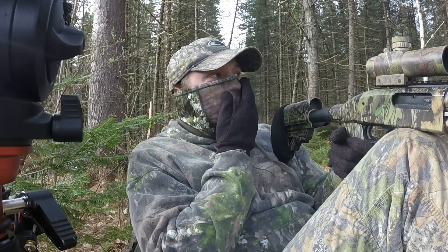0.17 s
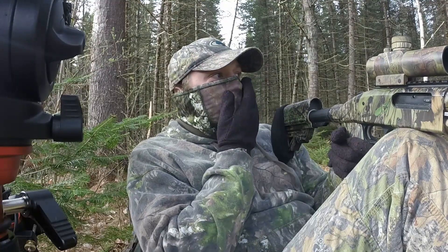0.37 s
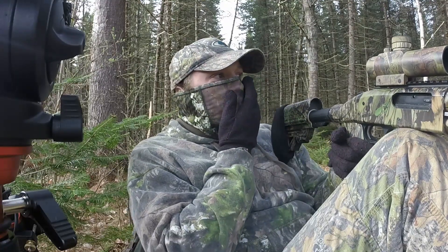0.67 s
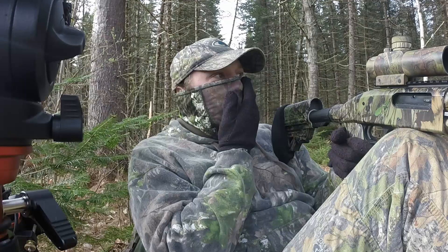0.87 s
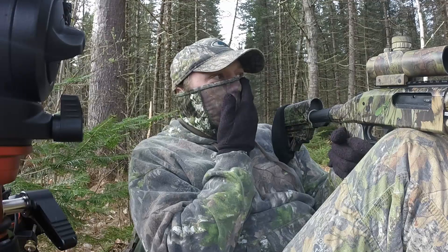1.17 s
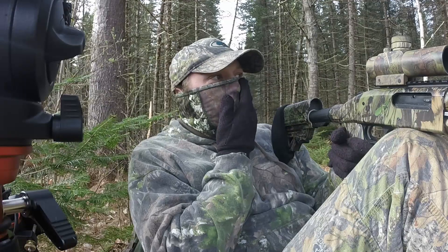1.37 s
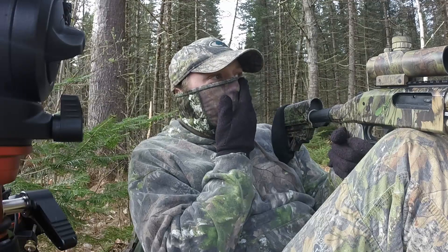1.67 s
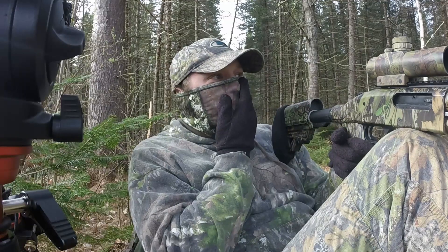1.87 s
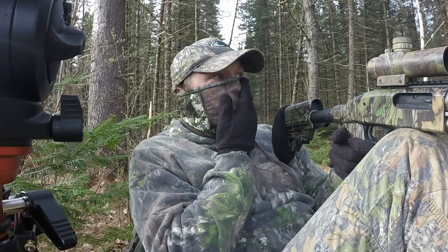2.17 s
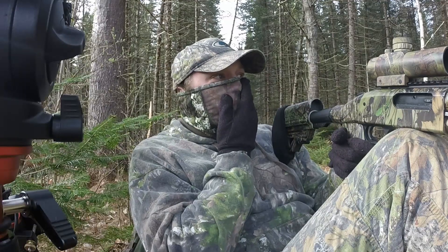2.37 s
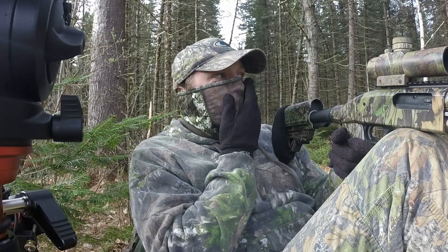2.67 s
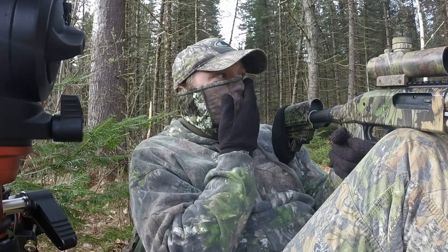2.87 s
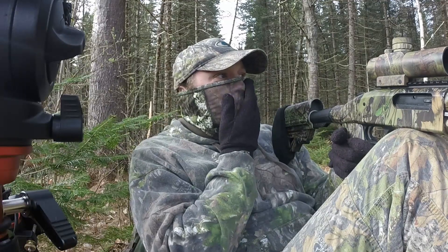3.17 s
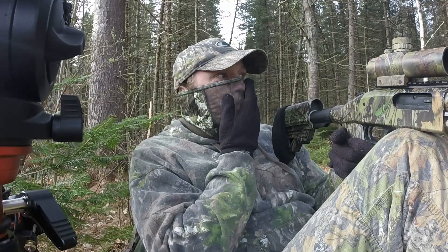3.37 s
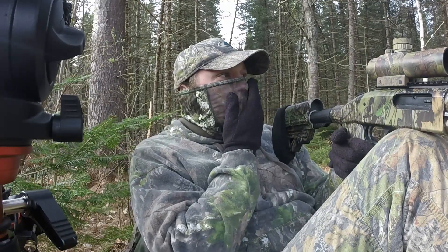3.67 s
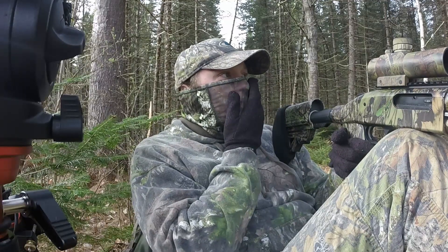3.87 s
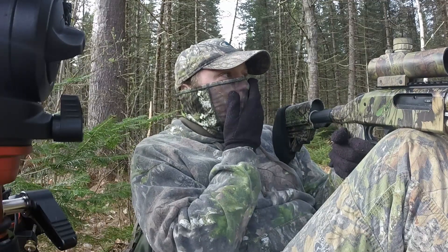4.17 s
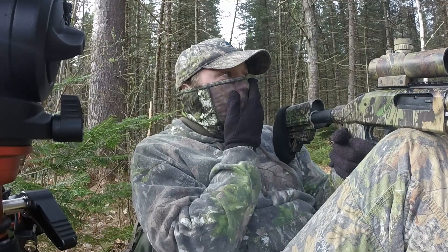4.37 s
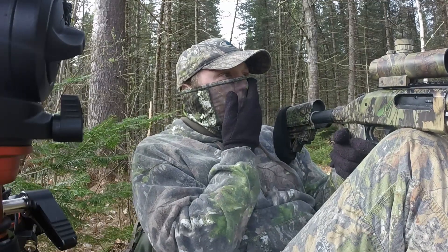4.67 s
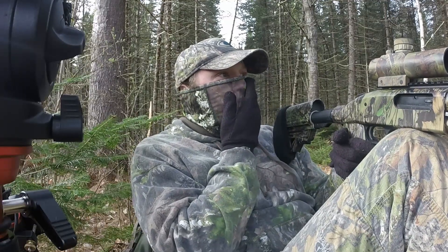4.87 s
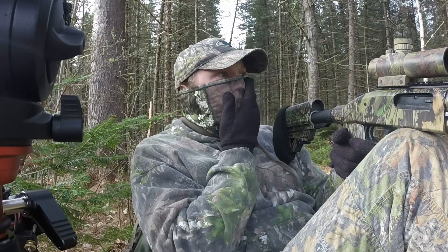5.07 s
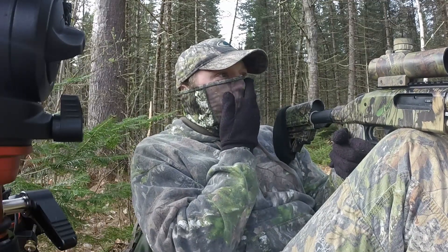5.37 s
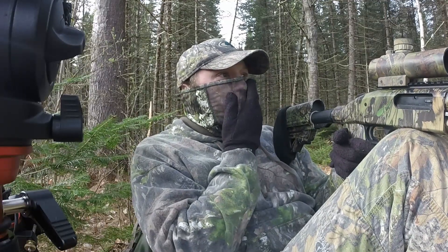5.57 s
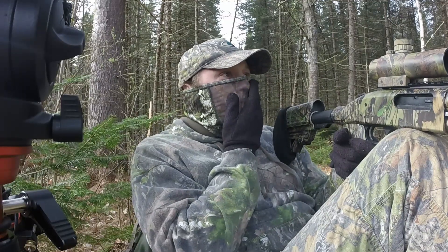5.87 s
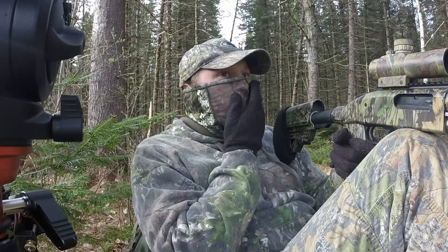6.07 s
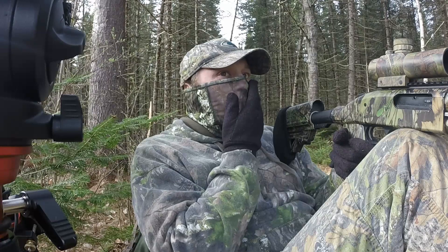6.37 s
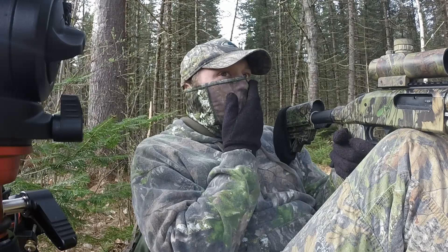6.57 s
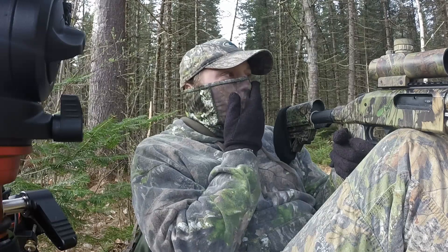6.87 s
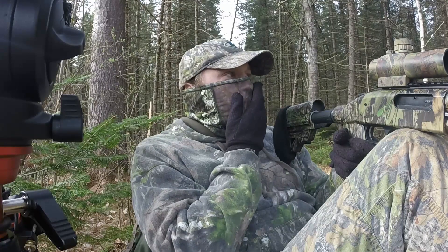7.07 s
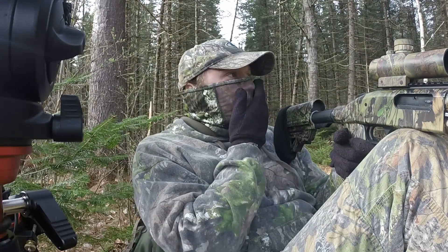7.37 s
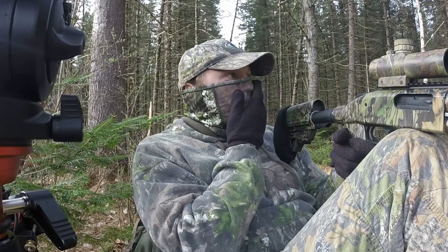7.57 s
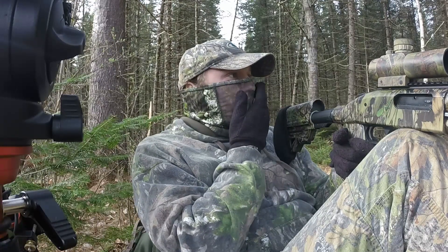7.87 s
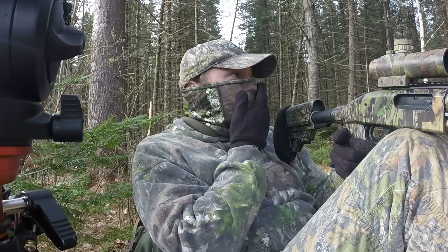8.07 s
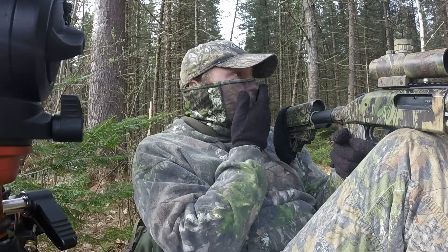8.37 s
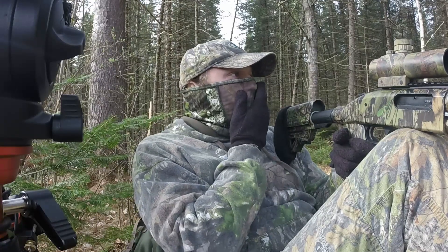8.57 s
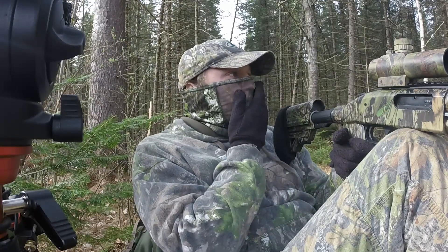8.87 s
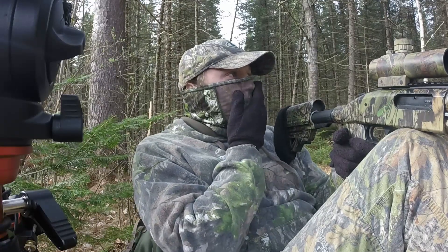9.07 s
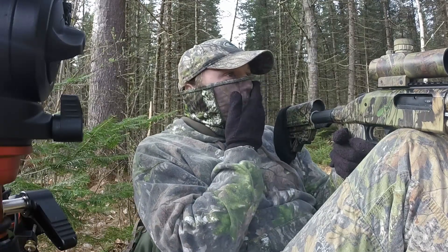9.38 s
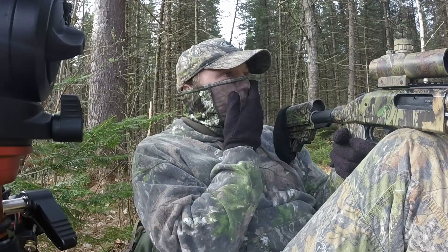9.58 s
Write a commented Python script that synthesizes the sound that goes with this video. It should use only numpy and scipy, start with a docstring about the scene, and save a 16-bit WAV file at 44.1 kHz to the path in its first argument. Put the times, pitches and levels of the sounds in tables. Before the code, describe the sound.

A hunter close by works a turkey mouth call in raspy yelps and sharp cutts while a distant tom gobbles back in a quiet conifer forest.

```python
"""A quiet conifer forest: a hunter works a turkey mouth call close by, with whines and yelps, then sharp
cutts, and at the end one more whine and yelp. Its reed is a harmonic oscillator that slides down clear, breaks
into a beating, noisy rasp, and darkens as the jaw drops and the octave fades; loud peaks saturate the recorder.
A distant tom answers twice with frequency-modulated gobbles. Far clucks and small songbirds are gliding
sines, scattered by the trees as decaying noise echoes, over filtered noise for the forest air."""
import sys
import numpy as np
from scipy import signal
from scipy.fft import rfft, irfft, next_fast_len
from scipy.io import wavfile

SR = 44100
rng = np.random.default_rng(int(sys.argv[2]) if len(sys.argv) > 2 else 0)


def unload_audio(sound):
    """Save the sound as a 16-bit wav file, at the path given as the first command line argument."""
    columns = np.transpose(np.atleast_2d(sound))
    # keep every value between -1 and 1, then stretch to whole-number steps
    steps = np.round(np.clip(columns, -1, 1) * 32767)
    wavfile.write(sys.argv[1], SR, steps.astype(np.int16))


N = 428652
TIME = np.arange(N) / SR  # s


def undb(db):
    """Level to amplitude: 20 dB is a factor of ten."""
    return 10 ** (np.asarray(db) / 20)


def unit(x):
    """Normalization: scale to an rms amplitude of 1."""
    return x / np.sqrt(np.mean(np.abs(x) ** 2))


def at_hz(hz, points):
    """Logarithmic frequency scale: interpolate (f/Hz, value) points along it."""
    f, value = np.transpose(points)
    return np.interp(np.log(hz + 1e-6), np.log(f), value)


def colour(x, points):
    """Linear filtering: weight the spectrum by (f/Hz, gain/dB) points."""
    n = x.shape[-1]
    gain = undb(at_hz(np.fft.rfftfreq(n, 1 / SR), points))
    return irfft(rfft(x) * gain, n)


def noise(size, width_hz, centre_hz=0):
    """Narrow-band noise under a Gaussian spectrum; centred on zero it is a random wobble."""
    n = next_fast_len(size + 8192)
    bell = np.exp(-.5 * ((np.fft.rfftfreq(n, 1 / SR) - centre_hz) / width_hz) ** 2)
    return unit(irfft(rfft(rng.standard_normal(n)) * bell, n))[:size]


def turn(hz):
    """Frequency modulation: phase is the running integral of frequency."""
    return 2 * np.pi * np.cumsum(hz) / SR


def swell(x):
    """Raised-cosine envelope: a smooth rise from 0 to 1 as x goes from 0 to 1."""
    return np.sin(np.pi / 2 * np.clip(x, 0, 1)) ** 2


def switch(t, at_s, width_s):
    """Sigmoid transition: a soft step from 0 to 1 around a moment."""
    return .5 + .5 * np.tanh((t - at_s) / width_s)


def add(track, s, sound):
    """Superposition: mix a sound into a track from a given time."""
    start = max(int(s * SR), 0)
    part = sound[:max(N - start, 0)]
    track[start:start + len(part)] += part


def trees(x, early_t60, late_t60, late_db, dull_hz):
    """Reverberation by scattering: near trunks decay fast, deep forest slowly; needles absorb treble."""
    t = TIME[:int(1.5 * SR)]
    decay = undb(-60 * t / early_t60) + undb(late_db - 60 * t / late_t60)
    fade = decay * np.clip((t - .006) / 0.0082, 0, 1)
    lowpass = signal.butter(2, min(dull_hz, .4 * SR), fs=SR, output="sos")
    echoes = signal.sosfilt(lowpass, rng.standard_normal((2, len(t))), axis=1)
    response = echoes * fade / np.sqrt(np.sum(fade ** 2))
    return signal.fftconvolve(x[None], response, axes=1)[:, :N]


def forest_air(level_db=-48, left_db=1.18, right_db=.5):
    """Partly coherent noise: low rumble shared by both sides, under a soft wide hiss."""
    # spectrum of the air: f/Hz, relative spectral level/dB
    air = [(20, -12), (62, 0.08), (95, -2), (160, -1), (280, -10), (450, -14), (900, -14.5), (1600, -21.5),
           (2400, -24.5), (4000, -27), (6500, -29), (8000, -31.5), (10000, -32), (15500, -43)]
    # coherence of left and right: f/Hz, likeness [0-1]
    likeness_points = [(30, .75), (80, 1), (170, .45), (350, 0.1004), (1000, .1), (8000, .03)]
    likeness = np.clip(at_hz(np.fft.rfftfreq(N, 1 / SR), likeness_points), 0, 1)
    mid, side = (unit(colour(rng.standard_normal(N), air)) for _ in range(2))
    side = irfft(rfft(side) * np.sqrt((1 - likeness) / (1 + likeness)), N)
    return np.array([mid + side, mid - side]) * undb([[left_db], [right_db]]) * undb(level_db)


def chirp(length, start_hz, end_hz, db, hoarse, hoarse_hz):
    """Gliding sine under a tapered envelope; random frequency modulation makes it hoarse."""
    n = max(int(length * SR), 64)
    hz = np.linspace(start_hz, end_hz, n) * (1 + hoarse * noise(n, hoarse_hz))
    return undb(db) * np.sqrt(2) * np.sin(turn(hz)) * signal.windows.tukey(n, .6)


def songbirds(song_direct_db=-9, song_forest_db=-1, chip_lead=0.021, chip_scatter_db=1.2,
              chip_direct_db=-1.5, chip_forest_db=-2, whistle_direct_db=-5, whistle_forest_db=-8):
    """Gliding tones, direct and scattered: a growing see-saw song, scratchy chips and pure whistles."""
    # one phrase of the song: offset t/s, length/s, start f/Hz, end f/Hz, level relative to the phrase/dB
    phrase = [(-.058, .04, 6900, 5300, -7), (-.012, .03, 6500, 5200, -4), (0, .04, 5600, 3950, -1),
              (.115, .06, 3050, 4700, -3), (.155, .03, 4600, 4450, -2), (.198, .045, 4150, 3200, -2)]
    # runs of thin chips from a second bird: t/s (chips lead it), number of chips, gap/s,
    # mean level before the path gains/dB
    chip_runs = [(.139, 2, .17, -60), (.562, 6, .099, -55.5), (1.378, 4, .095, -53.5), (1.93, 1, .1, -53),
                 (2.41, 4, 0.091, -54.5), (2.859, 4, .098, -53), (3.5, 3, 0.093, -53),
                 (4.699, 2, .111, -53.5), (5.681, 2, .101, -53), (6.34, 1, .1, -49.5),
                 (6.636, 3, 0.087, -51), (7.71, 2, .371, -48), (8.455, 5, 0.14, -50.5)]
    # whistles of other birds: t/s, length/s, start f/Hz, end f/Hz, level before the path gains/dB
    whistle_notes = [(3.438, 0.064, 6820, 7500, -55), (4.196, 0.1, 7250, 6800, -64),
                     (4.4, 0.15, 2800, 2830, -48.5), (4.598, 0.057, 5360, 5406, -56),
                     (4.64, 0.032, 4400, 3585, -47.5), (4.655, 0.033, 4300, 3490, -53.5),
                     (4.893, 0.087, 2754, 2770, -47), (5.056, 0.1, 5200, 5190, -54),
                     (8.249, 0.15, 7180, 7350, -58), (8.809, 0.13, 7400, 8080, -62)]
    song_s, first_gap_s, gap_growth_s = 5.843, .343, .0045
    full_db, soft_db, swell_s = -37, -17.5, 0.71  # full level, start relative to it, time constant of the swell

    song, chips, whistles = np.zeros((3, N))
    for k in range(8):
        s = song_s + k * first_gap_s + gap_growth_s * k * (k - 1) / 2
        db = full_db + soft_db * np.exp((song_s - s) / swell_s)
        for offset, length, start_hz, end_hz, part_db in phrase:
            add(song, s + offset, chirp(length, start_hz, end_hz, db + part_db, hoarse=.03, hoarse_hz=300))
    for s, count, gap, db in chip_runs:
        for k in range(int(round(count))):
            chip_db = db + chip_scatter_db * rng.standard_normal()
            add(chips, s - chip_lead + k * gap, chirp(.032, 6500, 5000, chip_db, hoarse=.15, hoarse_hz=500))
    for s, length, start_hz, end_hz, db in whistle_notes:
        add(whistles, s, chirp(length, start_hz, end_hz, db, hoarse=0.00404, hoarse_hz=80))

    far = undb(song_forest_db) * song + undb(whistle_forest_db) * whistles
    out = undb(song_direct_db) * song + undb(whistle_direct_db) * whistles + undb(chip_direct_db) * chips
    out = out + trees(far, early_t60=0.33, late_t60=1.0, late_db=-7, dull_hz=12000)
    chip_echo = trees(chips, early_t60=.16, late_t60=.6, late_db=-21.5, dull_hz=12000)
    return out + undb(chip_forest_db) * chip_echo


def clucks(forest_db=-7, direct_db=-1):
    """Falling, randomly frequency-modulated tones, with direct sound and scatter."""
    # far clucks: t/s, length/s, middle f/Hz, level before the path gains/dB
    cluck_notes = [(0.424, 0.04, 1133, -52), (2.828, 0.11, 1261, -50), (4.127, 0.058, 1276, -48),
                   (7.857, 0.014, 1600, -39.5), (7.876, 0.013, 1360, -39.5), (8.745, 0.032, 1195, -50.5)]
    dry = np.zeros(N)
    for s, length, hz, db in cluck_notes:
        add(dry, s, chirp(length, 1.06 * hz, hz / 1.06, db, hoarse=.13, hoarse_hz=350))
    echo = trees(dry, early_t60=0.24, late_t60=.8, late_db=-18.5, dull_hz=6150)
    return undb(direct_db) * dry + undb(forest_db) * echo


def whine(length, start_hz, low_hz, slide_s, db, steepness, octave_db, crack_s, depth):
    """Exponential glide, then register crack: pitch, loudness, octave and rasp of a clear note."""
    turn_at, rise, curve = .45, .38, 1.7  # share of the note where pitch turns, share it climbs, power of the climb
    clear_rasp, opens_at, end_octave_db = .05, .63, -12.5  # from opens_at on, the octave sinks to the end level
    flutter_depth, flutter_hz = .12, 94.96
    # crack: Gaussian width, added rasp, dip of the octave, loss after it, upward pitch share, rasp left behind
    width_s, crack_rasp, crack_octave_db, loss_db, jump, frayed_rasp = 0.0039, 0.79, -19.5, -9.5, .3, 0.075

    t = TIME[:int(length * SR)]
    along = t / length
    crack = depth * np.exp(-((t - crack_s) / width_s) ** 2)
    after = switch(t, crack_s, 2 * width_s)
    climb = np.clip((along - turn_at) / (1 - turn_at), 0, 1) ** curve
    hz = low_hz * (1 + rise * climb + jump * crack) + (start_hz - low_hz) * np.exp(-t / slide_s)
    loud = (1 - np.abs(2 * along - 1)) ** steepness * undb(db + depth * loss_db * after)
    loud = loud * np.exp(flutter_depth * noise(len(t), flutter_hz / 3, flutter_hz))
    octave = np.interp(along, [opens_at, 1], [octave_db, end_octave_db]) + crack_octave_db * crack
    return hz, loud, octave, clear_rasp + crack_rasp * crack + frayed_rasp * after


def yelp(length, attack, release, break_s, jaw_s, octave_db, fall_db_per_s, db, open_db,
         pitch_hz, open_hz, rasp, open_rasp):
    """Resonator retuning: the reed scoops down and breaks, then the jaw drops and the octave fades."""
    scoop_hz, scoop_share = 1418, .24  # starting pitch; time constant of the scoop as a share of the attack
    jaw_width_s, pitch_lag_s = .005, .008  # softness of the jaw drop; the reed's pitch follows this much later
    octave_floor_db = -26.5
    break_width_s, clear_rasp, rasp_ease = .003, .11, 0.21  # rasp before the break; share of the excess gone by the end

    t = TIME[:int(length * SR)]

    def with_jaw(before, after, lag=0):
        """Smooth transition between closed and open jaw."""
        return before + (after - before) * switch(t, jaw_s + lag, jaw_width_s)

    scoop = (scoop_hz - pitch_hz) * np.exp(-t / (scoop_share * attack))
    hz = with_jaw(pitch_hz, open_hz, pitch_lag_s) + scoop
    loud = swell(t / attack) * swell((length - t) / release) * undb(with_jaw(db, open_db))
    octave = np.clip(fall_db_per_s * (jaw_s - t), octave_floor_db, octave_db)
    broken = switch(t, break_s, break_width_s) * (1 - rasp_ease * swell(2 * t / length - 1))
    return hz, loud, octave, clear_rasp + (with_jaw(rasp, open_rasp) - clear_rasp) * broken


def reed_note(s, hz, loud, octave_db, rasp, patchy_db=2.8, stagger=.045, bloom=.1, flutter_hz=262,
              flutter=0.25, jitter=0.39, shake=0.08, throb=.38, tear=1.0, spray_db=-11,
              clean_spray_db=-42, low_share=0.097, sideband_share=0.12, quiver=0.12, lower_share=0.12):
    """Coupled oscillation: a latex reed sings, and with rasp a second, lower reed beats against it."""
    # overtones above the octave: f/Hz, level relative to the octave/dB
    overtones = [(2200, -22), (2600, -25.5), (3150, -21.5), (3450, -22.5), (3700, -41), (4200, -30.5),
                 (5200, -46), (6100, -39), (7500, -58), (12000, -66)]
    # spray of the rasping reed: f/Hz, relative spectral level/dB
    spray_points = [(100, -34.5), (420, -35), (700, -18), (1200, -11.5), (1900, 1), (2900, -7.5),
                    (4000, -12.5), (5200, -31), (6500, -24), (8500, -26.5), (10200, -31), (15500, -48.5)]
    # resonances of the mouth cavity: f/Hz, width/Hz, relative level/dB
    cavity = [(2600, 130, 8), (3850, 300, 1), (6700, 450, 2)]
    # set of the mouth: t/s, ring of the cavity/dB, lift of the highest overtones/dB
    mouth_set = [(1.2, -41, -4), (1.5, -37.5, -1), (2.4, -37, 2.5), (4.9, -20, -1.5), (5.25, -22, 1),
                 (5.4, -21.5, -0.5), (9.2, -31, 5.5)]

    rasp, n = np.clip(rasp, 0, 1), len(hz)
    t = s + TIME[:n]
    # as the jaw drops, the mouth passes the power from the octave to the fundamental
    low = loud / np.sqrt(1 + undb(octave_db) ** 2)
    high = low * undb(octave_db)
    # uneven swings smear each overtone more than the one below it
    beat = turn(flutter_hz * (1 + .2 * noise(n, 76.8)))
    # a rasping reed cannot hold its pitch and staggers around it
    unsteady_hz = hz * (1 + .003 * noise(n, 80) + stagger * rasp * noise(n, 40))
    phase = turn(unsteady_hz) + rasp * (flutter * np.sin(beat) + jitter * noise(n, 240))
    # the lower reed's octave and the sum tone of both reeds fill the gap under the first octave
    lower = phase - beat
    torn = np.clip(tear * rasp ** 1.9, 0, 1)
    octave = np.sqrt(1 - torn) * np.sin(2 * phase)
    octave = octave + np.sqrt(torn / 2) * (np.sin(2 * lower) + np.sin(phase + lower))
    # the lower reed sounds under the fundamental, and their beat throws a sideband above it
    sideband = rasp * loud * (lower_share * np.sin(lower) + sideband_share * np.sin(phase + beat))
    fundamental = low * np.sin(phase) * (1 + throb * np.sqrt(rasp) * noise(n, 42, 110))
    tone = fundamental + high * octave * (1 + quiver * noise(n, 30, 110)) + sideband

    edge = high + low_share * rasp * low  # strength that feeds the overtones and the spray
    mouth_s, *mouth = np.transpose(mouth_set)
    ring_db, lift_db = (np.interp(t, mouth_s, column) for column in mouth)
    # the upper overtones grow slightly faster than the note's loudness, the highest most
    push = loud / loud.max()
    for k in range(3, 13):
        lift = lift_db * at_hz(k * hz, [(3600, 0), (4200, 0.99)])
        overtone_db = at_hz(k * hz, overtones) + lift + patchy_db * noise(n, 45)
        tone += edge * push ** (bloom * (k - 2)) * undb(overtone_db) * np.sin(k * phase)
    tone *= np.sqrt(2) * (1 + shake * rasp * (np.cos(beat) + noise(n, 230)))

    # air escapes in uneven spits, chopped once a cycle
    spray = unit(colour(rng.standard_normal(n), spray_points))
    spray = spray * (undb(clean_spray_db) + undb(spray_db) * rasp ** 2.3)
    ring = rasp * sum(undb(db) * noise(n, width, f) for f, width, db in cavity) * undb(ring_db)
    spits = unit(np.exp(.42 * noise(n, 130)) * (1 + .5 * np.sin(phase)))
    return tone + edge * (spray + ring) * spits


def mouth_call(forest_db=-22.0):
    """Direct sound, early reflections and scatter: the call's notes, a little stronger on the left."""
    # clear whines: t/s, length/s, starting f/Hz, lowest f of the glide/Hz, slide time constant/s,
    # level before the crack/dB, steepness of the swell [power], octave over fundamental/dB,
    # crack after/s, depth of the crack [0-1]
    whine_notes = [(1.130, .152, 1100, 742.5, .020, -19.7, 1.0, 11.5, 0.054, 0.19),
                   (1.441, .133, 1059, 733.5, .011, -3.5, 0.7, 20.5, .083, 1),
                   (9.223, 0.18, 930, 715, .026, -16, 1.3, 5.5, .114, .2)]
    # rasping yelps and, with a quick attack, cutts: t/s, length/s, attack/s, release/s, reed breaks after/s,
    # jaw drops after/s, highest octave over fundamental/dB, its fall/(dB/s), then each before and after
    # the jaw drops: level/dB, level/dB, f/Hz, f/Hz, rasp [0-1], rasp [0-1]
    yelp_notes = [(1.721, 0.12, .034, .028, .036, .052, 7, 329.5, -8.5, -5.5, 986, 1057, 0.5, .75),
                  (1.994, .124, .030, .022, .033, .069, 4.5, 900, -9.5, -7, 1014, 1060, .92, .72),
                  (2.288, .105, .044, 0.022, .032, .044, 6, 600, -9.5, -7, 990, 1090, .9, .75),
                  (4.969, .085, .008, .012, .001, .033, 7, 450.5, -10, -7.5, 895, 1002, 0.73, .95),
                  (5.127, 0.11, 0.0094, 0.04, .003, 0.042, 0.5, 151, -10, -7.5, 1041, 1090, 0.96, 1),
                  (5.322, .097, .008, .015, 0.0068, .049, 9.5, 341.5, -9.5, -8.5, 1038, 1095, 0.91, 1),
                  (9.502, 0.15, .062, 0.034, .054, .069, 8.5, 800, -10, -7, 777, 1103, .55, .88)]
    # lead of the left microphone port over the right, for the caller: f/Hz, phase/rad
    port_lead = [(200, -0.29), (520, -0.82), (800, -0.47), (1290, -0.87), (1720, -0.31), (2200, -0.55),
                 (4000, 0.74), (8000, 0.97)]
    # reflections from the gun, the knee and the ground: delay/s, left level/dB, right level/dB
    nearby = [(.0052, -19.5, -18.5), (.0074, -19, -15), (0.0158, -20, -16.5)]

    dry = np.zeros(N)
    for gesture, notes in (whine, whine_notes), (yelp, yelp_notes):
        for s, *shape in notes:
            add(dry, s, reed_note(s, *gesture(*shape)))
    lead = at_hz(np.fft.rfftfreq(N, 1 / SR), port_lead)
    left = irfft(rfft(dry) * np.exp(1j * lead), N)
    out = np.array([undb(1.1) * left, undb(-.5) * dry])
    for delay, *sides_db in nearby:
        for ear, db in zip(out, sides_db):
            add(ear, delay, undb(db) * dry)
    # the bright part of the call carries furthest among the trunks
    outward = colour(dry, [(700, -0.5), (1050, -2.0), (1300, 4.0), (1550, -2),
                           (2100, -0.5), (3500, 5.5), (7000, 4.0)])
    echo = trees(outward, early_t60=.4, late_t60=1.25, late_db=-19, dull_hz=8000)
    return out + undb(forest_db) * echo


def gobbles(start_hz=665, end_hz=570, rattle_hz=19, fall_db=-12, rattle_db=-6, yelp_db=1.5, direct_db=-3):
    """Amplitude and frequency modulation: a first yelp over a fading, hoarse rattle, blurred by scatter."""
    # the tom's gobbles: t/s, length/s, attack of the yelp/s, level before the part and path gains/dB
    gobble_calls = [(3.166, 1.3, 0.041, -38.5), (6.613, .85, 0.006, -39.5)]
    # his voice after its way through the trees: f/Hz, gain/dB
    tom = [(450, -28), (670, -11), (780, -18.5), (1050, -6), (1320, -8.5), (1550, -11.5), (1800, -15.5),
           (2150, -20), (2650, -22), (3200, -19.5), (5000, -35), (8000, -39)]
    dry = np.zeros(N)
    for s, length, attack, db in gobble_calls:
        t = TIME[:int(length * SR)]
        n = len(t)
        syllable = turn(rattle_hz * (1 + 0.32 * noise(n, 8)))
        glide_hz = np.interp(t, [0, length], [start_hz, end_hz])
        hz = glide_hz * (1 + 0.0986 * np.sin(syllable) + 0.27 * noise(n, 249.4))
        voice = unit(colour(sum(np.sin(k * turn(hz)) for k in range(1, 10)), tom))
        ramps = np.clip(np.minimum(t / 0.046, (length - t) / 0.092), 0, 1)
        rattle = voice * undb(rattle_db + fall_db * t / length) * ramps * (1 + .5 * np.sin(syllable))
        # the first yelp lies an octave above the rattle's starting pitch
        first_yelp = np.sqrt(2) * np.sin(turn(2 * start_hz * (1 + 0.08 * noise(n, 202))))
        first_yelp = first_yelp * np.minimum(t / attack, 1) * np.exp(-(t / 0.087) ** 2)
        add(dry, s, undb(db) * (undb(yelp_db) * first_yelp + rattle))
    return undb(direct_db) * dry + trees(dry, early_t60=0.35, late_t60=1.2, late_db=-12.5, dull_hz=9000)


def scene():
    """Superposition: the caller close by, the birds far off, and the air around them."""
    return mouth_call() + gobbles() + clucks() + songbirds() + forest_air()


def record(dry, drive_db=-0.16, duck=9, release_s=.22, bass_hz=115, top_hz=15800):
    """Compression and saturation: loud sound turns the bass down, peaks flatten, the top is cut."""
    keep = np.exp(-1 / (release_s * SR))

    def smooth(x):
        """Exponential averaging with the release time constant."""
        return signal.lfilter([1 - keep], [1, -keep], x)

    loudness = smooth(smooth(np.abs(dry).mean(axis=0)))
    bass = signal.sosfiltfilt(signal.butter(2, bass_hz, fs=SR, output="sos"), dry)
    sound = undb(drive_db) * (dry - bass + bass / (1 + duck * loudness))
    flat = sound / (1 + np.abs(sound) ** 14) ** (1 / 14)  # saturates at full scale
    return signal.sosfilt(signal.ellip(8, .1, 70, top_hz, fs=SR, output="sos"), flat)


dry = scene()
out = record(dry)
unload_audio(out)
```